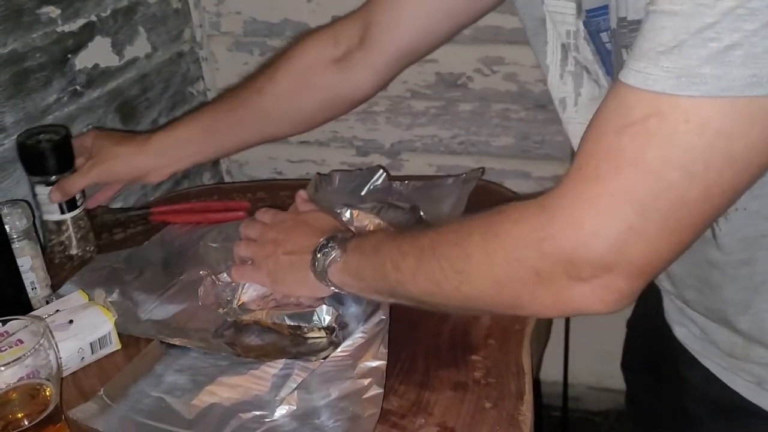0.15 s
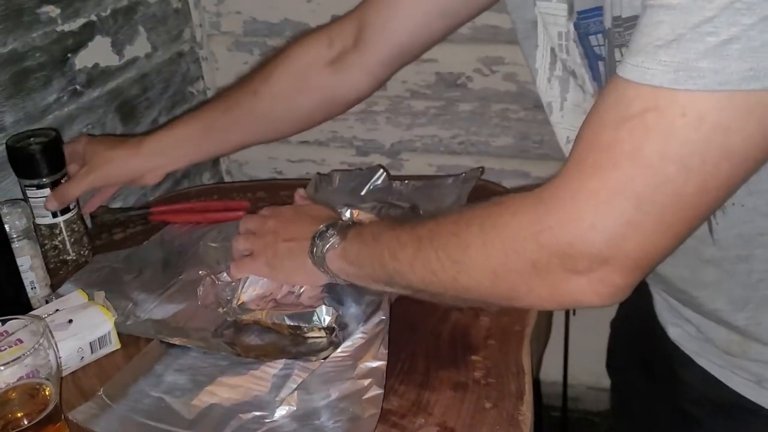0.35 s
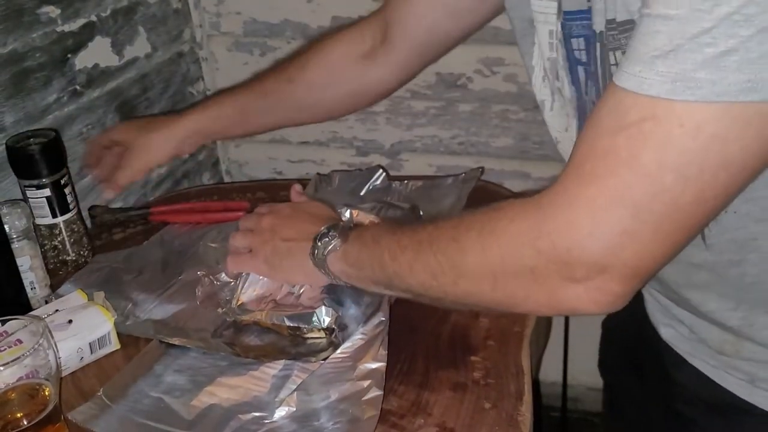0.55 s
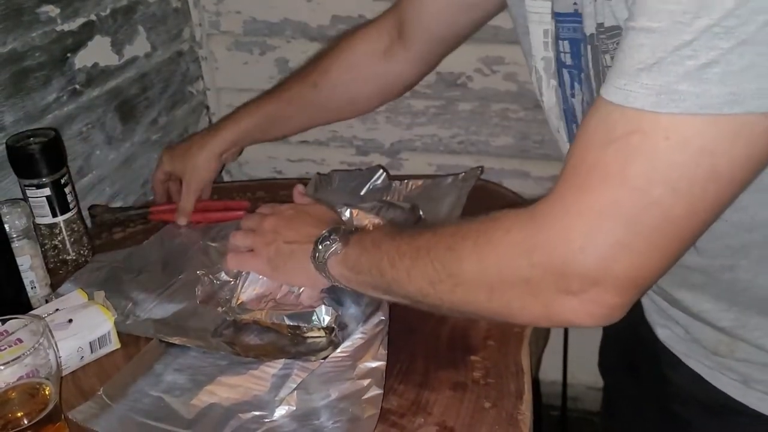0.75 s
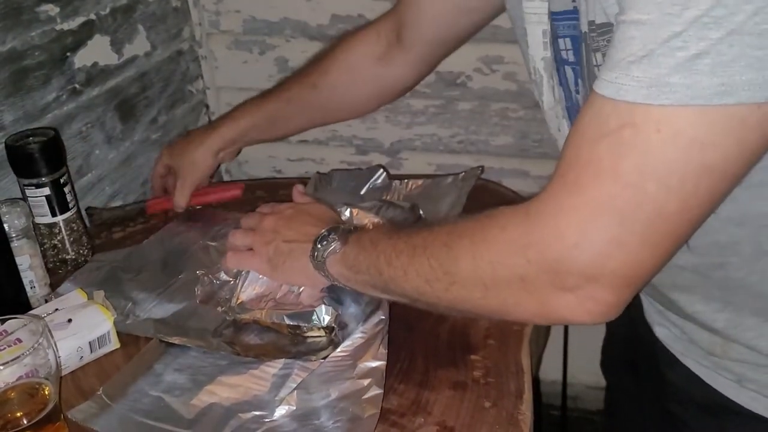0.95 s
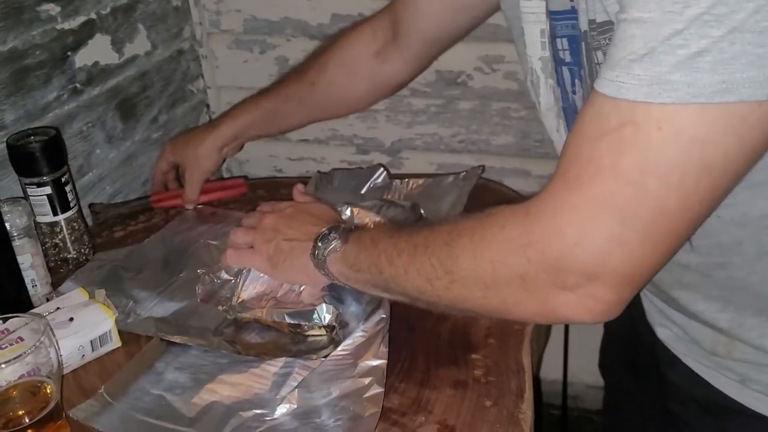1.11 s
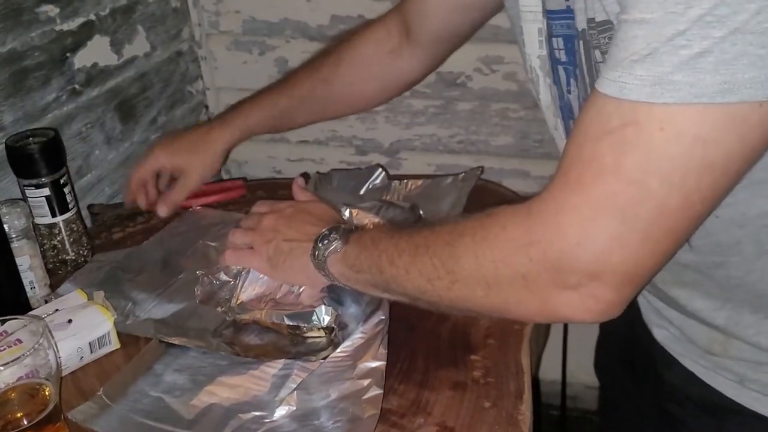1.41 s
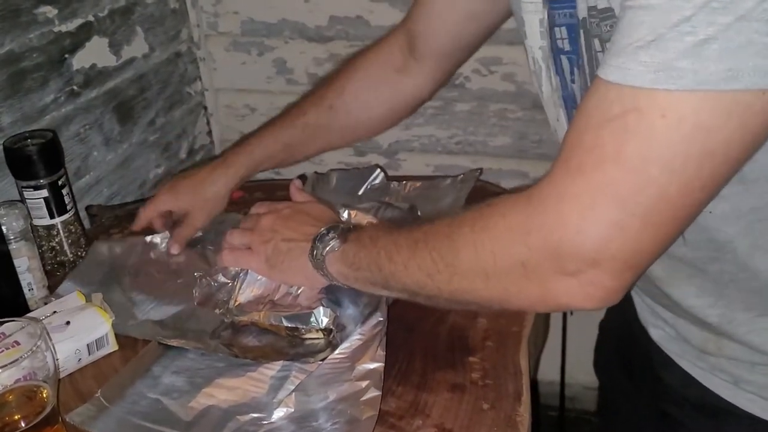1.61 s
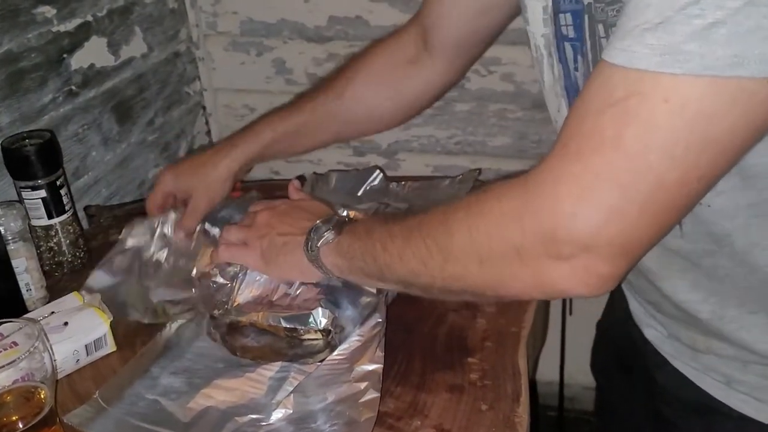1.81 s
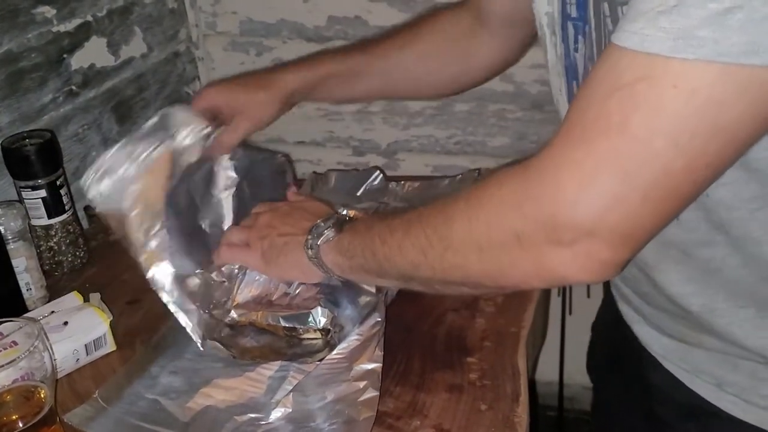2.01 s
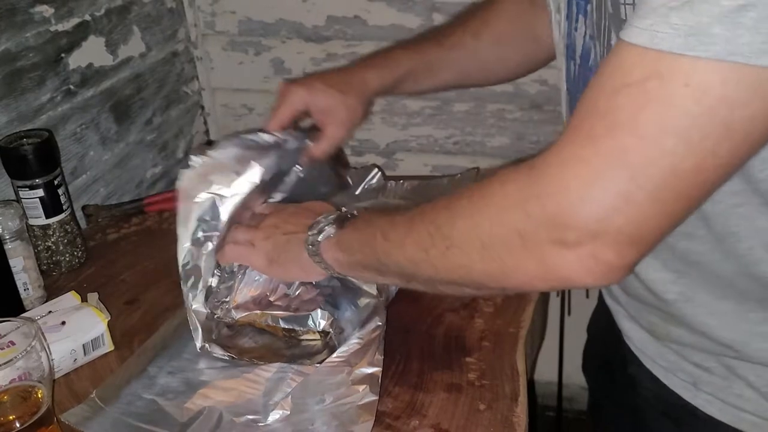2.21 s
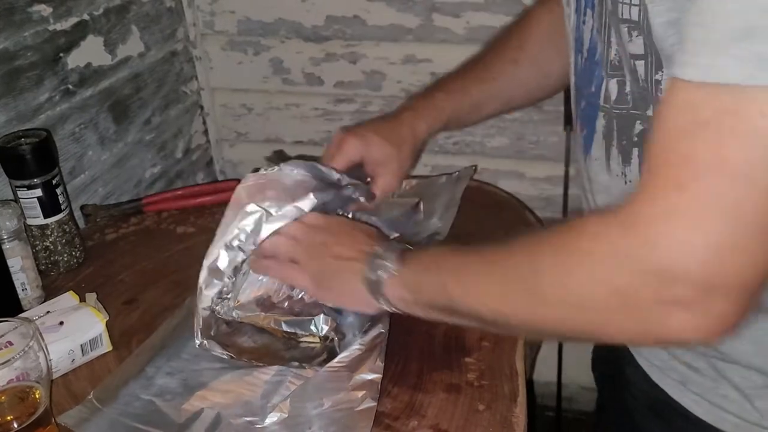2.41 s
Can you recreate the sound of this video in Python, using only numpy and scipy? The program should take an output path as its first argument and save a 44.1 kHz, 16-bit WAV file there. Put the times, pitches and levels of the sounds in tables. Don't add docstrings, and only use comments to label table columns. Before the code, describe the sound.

Aluminium foil crackles in short, dry bursts under a resting hand, with a soft jar tap on the wooden table at 0.2 seconds. Tongs knock and rattle at 1.13 and land with a small metallic chirp at 1.4, near a faint bird chirp. From 1.57 to the end the sheet lifts and folds in a dense bright rustle. Low wind thumps grow on the right; distant insects hiss faintly.

```python
import sys
import numpy as np
from scipy import signal
from scipy.fft import rfft, irfft
from scipy.io import wavfile
from scipy.ndimage import uniform_filter1d

SR = 44100
rng = np.random.default_rng(int(sys.argv[2]) if len(sys.argv) > 2 else 0)


def gain_from_db(level_db):
    decades = np.asarray(level_db, float) / 20
    return 10 ** decades


def inscribe(sig):
    pcm = np.round(np.clip(np.atleast_2d(sig).T, -1, 1) * 32767)
    wavfile.write(sys.argv[1], SR, pcm.astype(np.int16))


N = 112454


def rms_one(x):
    return x / np.sqrt(np.mean(x ** 2) + 1e-20)


def in_time(rows):
    s, *columns = np.transpose(rows)
    return [np.interp(np.arange(N) / SR, s, c) for c in columns]


def at_hz(points, hz):
    points = np.array(points)
    return np.interp(np.log(hz), np.log(points[:, 0]), points[:, 1])


def drift(rate_hz):
    r = np.exp(-40 * np.pi * rate_hz / SR)
    slow = signal.lfilter([1], [1, -2 * r, r * r], rng.standard_normal(N // 20 + 2002))[2000:]
    return np.interp(np.arange(N) / 20, np.arange(len(slow)), rms_one(slow))


def band(x, low_hz, high_hz, order=2):
    return signal.sosfilt(signal.butter(order, [low_hz, high_hz], "band", fs=SR, output="sos"), x)


def sides(pan_db):
    return gain_from_db(np.array([pan_db / 2, -pan_db / 2]))


# frequency_hz, likeness (0 to 1)
COHERENCE = [(250, 0.87), (700, 0.18), (2000, 0.16), (8000, 0.18)]


def coloured(source, spectrum, dull_db, patchy_db, hollow_db=0, balance=None):
    patches_per_s, hollow_hz, hollow_octaves = 22, (538, 1900), 0.71
    out, treble_power = 0, 0
    edges = 160 * 2 ** np.arange(0, 7.1, .5)
    for k, (low, high) in enumerate(zip(edges, edges[1:])):
        mid, side = band(source[k % 2], low, min(high, 19000))
        hz = np.sqrt(low * high)
        alike = np.clip(at_hz(COHERENCE, hz), 0, 1)
        flat = gain_from_db(at_hz(spectrum, hz) - 40 * (hz < spectrum[0][0] * .8))
        treble_power += flat ** 2 * (high - low) * (4000 < hz < 15000) * 2 / SR
        patchiness_db = patchy_db * min(1, (3000 / hz) ** 0.48) * drift(patches_per_s)
        hollow = sum(np.exp(-(np.log2(hz / h) / hollow_octaves) ** 2) for h in hollow_hz)
        gain = flat * gain_from_db(dull_db * np.log2(9000 / hz) + patchiness_db) * gain_from_db(hollow_db * hollow)
        if balance:
            gain = gain * sides(at_hz(balance, hz))[:, None]
        out = out + gain * (np.sqrt(1 + alike) * mid + np.sqrt(1 - alike) * side * [[1], [-1]])
    return out / np.sqrt(2 * treble_power)


# frequency_hz, density_db (per Hz)
AIR_SPECTRUM = [(88, -32), (150, -10), (280, 3.5), (1340, -16), (2700, -48), (3770, -13), (4410, -27),
                (16000, -27.5)]


def outdoors():
    air = gain_from_db(-85) * coloured(rng.standard_normal((2, 2, N)), AIR_SPECTRUM, 0, patchy_db=-2.5)
    insects = rms_one(band(rng.standard_normal((2, N)), 3040, 3960))
    return air + gain_from_db(-68 + 3.6 * drift(16)) * insects


# start_s, length_s, level_db, from_hz, to_hz
BIRD_CHIRP = (1.345, .05, -61, 4550, 4050)


def bird():
    s, length, db, from_hz, to_hz = BIRD_CHIRP
    part = np.clip((np.arange(N) / SR - s) / length, 0, 1)
    hz = from_hz + (to_hz - from_hz) * part
    return gain_from_db(db) * 4 * part * (1 - part) * np.sin(2 * np.pi * np.cumsum(hz) / SR)


# time_s, level_db
GUSTS = [(0, -88.5), (.33, -74.5), (.4, -75), (.5, -74), (.63, -58), (.9, -58.5), (1.0, -76), (1.14, -54),
         (1.24, -59), (1.33, -60.5), (1.42, -65.5), (1.75, -54.5), (2.05, -47), (2.35, -51), (2.55, -56)]
# time_s, level_db, pitch_hz
PORT_FLUTTER = [(0, -90, 54.7), (.45, -72, 49.8), (.56, -54.5, 55.6), (.6, -68, 60), (.63, -49, 56.3),
                (.71, -56, 53.8), (.75, -46, 69.3), (.8, -55, 49), (.89, -48, 64), (.92, -62, 53.4),
                (1.0, -90, 54.96), (1.6, -64, 58.37), (1.74, -44.5, 55.9), (1.8, -53, 59.7),
                (1.9, -42, 64.75), (2.1, -47, 55.4), (2.3, -53, 63.2), (2.55, -51, 49.24)]
# centre_s, level_db, pitch_hz
PUFFS_LEFT = [(.375, -50.5, 75.5), (.41, -52, 49.4), (.6, -49, 42)]
PUFFS_RIGHT = [(0.621, -53, 70.6), (0.756, -40.5, 99), (0.539, -47, 46), (0.962, -53.5, 121),
               (1.105, -47, 100), (1.379, -35.5, 57.6), (1.731, -35, 90), (1.765, -37.5, 55.2),
               (1.891, -35, 61), (1.924, -25, 73), (2.3, -33, 54.4), (2.344, -35, 86.5)]


def wind():
    lump_db, left_port_db, puff_cycles = 7, -18.5, 0.57
    noise = rms_one(band(rng.standard_normal((2, N + SR)), 28.6, 112.2, order=3)[:, SR:])
    lumps_db = lump_db * np.array([drift(11.0), drift(10.0)])
    out = noise * gain_from_db(in_time(GUSTS)[0] + 6 + lumps_db)
    out = out * gain_from_db([[left_port_db], [0]])
    db, hz = in_time(PORT_FLUTTER)
    wandering_hz = hz * (1 + 0.073 * drift(16.8))
    out[1] += gain_from_db(db + 6) * np.sin(2 * np.pi * np.cumsum(wandering_hz) / SR)
    t = np.arange(N) / SR
    for port, puffs in enumerate([PUFFS_LEFT, PUFFS_RIGHT]):
        for s, db, hz in puffs:
            envelope = np.exp(-((t - s) * hz / puff_cycles) ** 2)
            out[port] -= gain_from_db(db + 3) * envelope * np.sin(2 * np.pi * hz * (t - s))
    return out


# start_s, length_s, level_db, centre_hz, width_hz
SCRAPES = [
    (0.369, 0.11, -57.5, 1440, 690),
    (1.402, 0.0067, -45.5, 4520, 700),
    (1.402, 0.0082, -44, 5700, 600),
]


def scrapes():
    out = 0
    for s, length, db, hz, width_hz in SCRAPES:
        swell = np.sin(np.pi * np.clip((np.arange(N) / SR - s) / length, 0, 1))
        noise = band(rng.standard_normal((2, N)), hz - width_hz / 2, hz + width_hz / 2)
        out = out + gain_from_db(db) * swell * rms_one(noise)
    return out


def wall(x):
    low_t60_s, high_t60_s, tail_db = 0.29, 0.21, -11.5
    t = np.arange(SR // 2) / SR
    split = signal.butter(2, 890, fs=SR, output="sos")
    noise = rng.standard_normal((2, len(t)))
    low = signal.sosfilt(split, noise)
    tail = low * gain_from_db(-60 * t / low_t60_s) + (noise - low) * gain_from_db(-60 * t / high_t60_s)
    tail = tail * (t > .004)
    tail = tail / np.sqrt(np.sum(tail ** 2, axis=1, keepdims=True))
    low = signal.sosfiltfilt(split, x)
    direct = low * sides(-1.5)[:, None] + (x - low) * sides(0.5)[:, None]
    return direct + gain_from_db(tail_db) * signal.oaconvolve(x[None], tail, axes=1)[:, :N]


def table(knocks, modes, count=3):
    rattle_s, rattle_db, darken_db = .012, -9, 104
    s, db = np.transpose(knocks)
    s = np.append(s, s[:, None] + rattle_s * rng.uniform(0.196, 1, (len(s), count)))
    db = np.append(db, np.repeat(db + rattle_db, count))
    out = np.zeros(N)
    for k, (hz, level_db, t60) in enumerate(modes):
        clicks = np.full(N, 1e-18)
        darker_db = darken_db * (s - s[0]) * np.log2(hz / 300)
        strike_db = db + level_db - darker_db + 1.7 * rng.standard_normal(len(s))
        clicks[(s * SR).astype(int)] = gain_from_db(strike_db) * (-1) ** k
        r, w = gain_from_db(-60 / (t60 * SR)), 2 * np.pi * hz / SR
        out += signal.lfilter([0, np.sin(w)], [1, -2 * r * np.cos(w), r * r], clicks)
    return band(out, 46, 1320)


# start_s, strength_db
JAR_HITS = [
    (.207, -40),
    (.216, -38.5),
    (.228, -67),
]
LIFT_HITS = [
    (1.131, -19.5),
    (1.144, -24.5),
    (1.161, -28),
    (1.19, -44),
]
DROP_HITS = [
    (1.403, -25.5),
    (1.414, -37),
    (1.428, -36.5),
    (1.44, -38.5),
]
# frequency_hz, level_db, t60_s
JAR_TABLE_MODES = [(128, -8, 0.24), (217, -2, 0.04), (315, -12, 0.063), (392, -9, 0.036)]
LIFT_TABLE_MODES = [(149.5, -7.5, 0.042), (239, -5, 0.035), (346, 2.5, 0.032), (386, -7, 0.078),
                    (423, -16, 0.19), (559, -3.5, 0.038), (679, -5.5, 0.03), (720, -7.5, 0.052),
                    (874, -3.5, 0.024), (1010, -18, 0.047), (1054, -17, 0.087), (1250, -8.5, 0.021),
                    (1340, -22, 0.1), (1544, -11, 0.024), (1986, -23.5, 0.053)]
DROP_TABLE_MODES = [(60.5, -9, 0.24), (121, -4, 0.14), (172, -8.5, 0.032), (237, -4.5, 0.084),
                    (292, -2.5, 0.038), (410, -0.5, 0.034), (476, -7, 0.056), (550, 0.5, 0.025),
                    (707, 0, 0.017), (747, -7.5, 0.042), (840, -11, 0.03), (985, -4.5, 0.021),
                    (1220, -25, 0.049)]


def knocking():
    jar = table(JAR_HITS, JAR_TABLE_MODES)
    return jar + table(LIFT_HITS, LIFT_TABLE_MODES) + table(DROP_HITS, DROP_TABLE_MODES)


def buckling(t60, count=6):
    clicks_per_s, spread_db, clump_db = 7000, -0.5, 0.85
    born = rng.random(N) < clicks_per_s * gain_from_db(clump_db * drift(90)) / SR
    size = gain_from_db(spread_db * np.minimum(rng.exponential(1, N), 5))
    clicks = born * size * rng.choice([-1, 1], (2, 2, N))
    patch = rng.integers(0, count, (2, 1, N))
    t, out = np.arange(1024) / SR, 0
    for k in range(count):
        spectrum = rfft(rng.standard_normal((2, 2, len(t))) * gain_from_db(-60 * t / t60))
        ring = irfft(spectrum / np.sqrt(uniform_filter1d(abs(spectrum) ** 2, size=15)))
        out = out + signal.oaconvolve(clicks * (patch == k), ring, axes=2)[..., :N]
    return rms_one(out)


# time_s, level_db
HAND_PRESS = [(0, -61.5), (.11, -68), (.22, -62.5), (.4, -63), (.54, -69), (.68, -75.5), (.83, -74),
              (.99, -77), (1.09, -78.5), (1.2, -65), (1.3, -80), (1.42, -64), (1.53, -72)]
# peak_s, peak_db, attack_s, t60_s,
# dullness_db (per octave)
CREASE_SNAPS = [(0.07, -43.5, 0.0016, 0.04, 3.5), (0.139, -40, 0.024, 0.21, 3),
                (0.1779, -28, 0.0029, 0.029, -2.5), (0.205, -56.5, 0.0013, 0.048, 16),
                (0.268, -36.5, 0.0046, 0.013, 4), (0.288, -35.5, 0.0039, 0.065, 3.5),
                (0.306, -40, 0.0025, 0.043, 5.1), (0.348, -38.5, 0.0016, 0.058, 3.5),
                (0.389, -50.5, 0.024, 0.22, 7), (0.478, -45.5, 0.005, 0.083, 6.5),
                (0.514, -48, .003, 0.03, 2.5), (0.561, -47.5, 0.0014, 0.022, 5.5),
                (0.619, -41, 0.002, 0.055, -2), (0.729, -43.5, 0.0013, 0.063, -0.5),
                (0.757, -41.5, 0.0029, 0.098, 2.5), (0.799, -50, 0.0037, 0.19, 1),
                (0.856, -46.5, 0.0024, 0.13, -1.5), (0.912, -39.5, 0.065, 0.13, 2.5),
                (1.141, -33.5, 0.0077, 0.082, -4), (1.15, -41.5, 0.021, 0.11, 10),
                (1.25, -52.5, 0.0077, 0.25, 6.5), (1.406, -31, 0.001, 0.025, -1),
                (1.46, -45.5, 0.0023, 0.024, 5), (1.467, -38.5, 0.0008, 0.042, 5)]
# frequency_hz, density_db (per Hz)
CREASE_SPECTRUM = [(410, -49), (700, -23.5), (2160, -10), (2400, -12), (5840, -4), (8990, -2.5),
                   (11400, 1.5), (16000, -3)]


def pressing():
    crest_db, crack_db, crack_t60_s = -11.5, 5.5, 0.0055
    t = np.arange(N) / SR
    gain = gain_from_db(in_time(HAND_PRESS)[0]) * (t < FOLD_CURVE[0][0])
    dull = gain * 6.5
    for s, db, attack, t60, dull_db in CREASE_SNAPS:
        rise = np.clip((t - s) / attack + 1, 0, 1)
        burst = rise * gain_from_db(db + crest_db - 60 * np.clip(t - s, 0, 1) / t60)
        if attack < .0045:
            since = np.clip(t - s + attack, 0, 1)
            crack = gain_from_db(db + crest_db + crack_db - 60 * since / crack_t60_s)
            burst = burst + (t >= s - attack) * crack
        gain, dull = gain + burst, dull + burst * dull_db
    mean_dull_db = dull / (gain + 1e-9)
    return gain * coloured(buckling(t60=0.0028), CREASE_SPECTRUM, mean_dull_db, patchy_db=1.0)


# time_s, level_db, dullness_db (per octave, as more sheet moves)
FOLD_CURVE = [(1.566, -38.5, -3), (1.6, -41, -2), (1.65, -29.5, -2.5), (1.7, -37.5, -0.5),
              (1.75, -38.5, -2), (1.83, -36, -1.3), (1.86, -36, -2), (1.925, -43, -0.5),
              (1.955, -38.5, 0.2), (1.99, -40, 0.04), (2.06, -30.5, 0.42), (2.13, -34.5, 0.07),
              (2.21, -39, 0.04), (2.26, -38, 0.13), (2.34, -36, 0.5), (2.46, -35.5, 0.5),
              (2.55, -39.5, 0.5)]
# time_s, left_minus_right_db, hollow_db
SHEET_SWING = [(1.56, -3, -8), (1.66, -1.5, -8.5), (1.72, 0, -1), (1.77, 0, -0.5), (1.83, 0.5, 4.5),
               (1.88, 0.5, 0), (1.95, -1, -1), (2.1, -1, 0), (2.55, -1.5, 3.5)]
# start_s, boost_db, t60_s
BIG_CREASES = [(1.571, 4.5, 0.14), (1.618, -1, .1), (1.633, 0.5, 0.19), (1.795, 3, 0.11),
               (1.894, 5.5, 0.056), (1.949, 4.5, 0.047), (2.034, 2, 0.2), (2.076, 0.5, .1),
               (2.152, 2.5, 0.097), (2.216, 3, 0.12), (2.269, 1.5, 0.071), (2.317, 1, 0.15),
               (2.38, 2.5, .12), (2.448, 1.5, 0.088)]
# frequency_hz, density_db (per Hz)
SHEET_SPECTRUM = [(120, -54), (200, -13.5), (311, 1.5), (548, -14.5), (709, -8.5), (2130, -4), (8900, -3),
                  (15100, 1), (16000, -0.5)]
# frequency_hz, left_minus_right_db
SHEET_BALANCE = [(60, -15.5), (130, 19), (290, -6), (640, 6), (1410, -0.5), (3100, 5), (6820, 2.5),
                 (15000, 2)]


def folding():
    attack_s = 0.012
    t = np.arange(N) / SR
    level_db, dull_db = in_time(FOLD_CURVE)
    pan_db, hollow_db = in_time(SHEET_SWING)
    rise = np.clip((t - FOLD_CURVE[0][0]) / attack_s + 1, 0, 1) ** 2
    for s, boost_db, t60 in BIG_CREASES:
        decay = (t >= s) * gain_from_db(-60 * np.clip(t - s, 0, 1) / t60 / 2)
        rise = rise * (1 + (gain_from_db(boost_db) - 1) * decay)
    sheet = coloured(buckling(t60=.011), SHEET_SPECTRUM, dull_db, 1.64, hollow_db, SHEET_BALANCE)
    return rise * gain_from_db(level_db + 2.5) * sides(pan_db) * sheet


def scene():
    knocks = knocking()
    foil = folding() + pressing() * sides(2)[:, None]
    return foil + wall(knocks) + scrapes() + bird() + wind() + outdoors()


def gate(x, size=2048):
    threshold_db, slope = -2.5, 0.71
    hole_db, hole_bins, hole_frames, hole_rarity = -22, 7, 3, 1.75
    hz, _, cells = signal.stft(x, SR, nperseg=size)
    power = abs(cells) ** 2 + 1e-24
    share = power / uniform_filter1d(power, size=25, axis=1)
    gain = np.minimum(1, share / gain_from_db(2 * threshold_db)) ** slope
    chance = rng.standard_normal(power.shape[1:])[np.arange(len(hz)) // hole_bins]
    chance = rms_one(uniform_filter1d(chance, size=hole_frames, axis=1))
    gain = gain * gain_from_db(hole_db * (chance > hole_rarity))
    gain[:, hz < 450] = 1
    return signal.istft(cells * gain, nperseg=size)[1][:, :N]


def top_cut(x):
    return signal.sosfilt(signal.butter(12, 17000, fs=SR, output="sos"), x)


def record(dry):
    spaced = gate(np.array([dry[0], np.roll(dry[1], 7)]))
    cut = signal.sosfilt(signal.ellip(12, .3, 60, 15850, fs=SR, output="sos"), spaced)
    return top_cut(cut)


dry = scene()
out = record(dry)
inscribe(out)
```